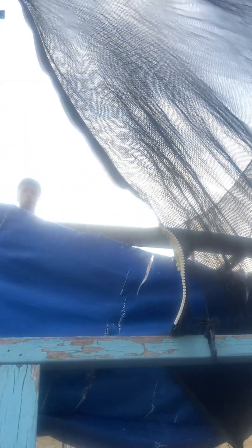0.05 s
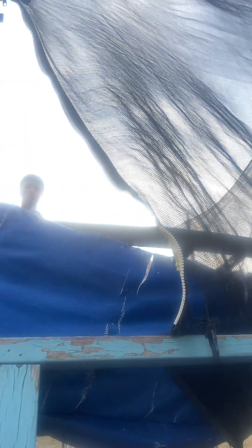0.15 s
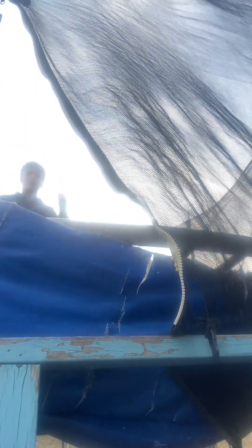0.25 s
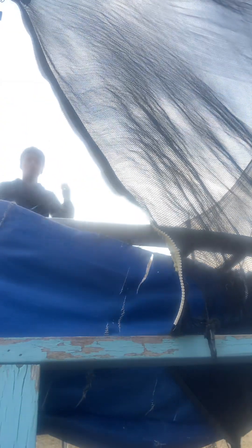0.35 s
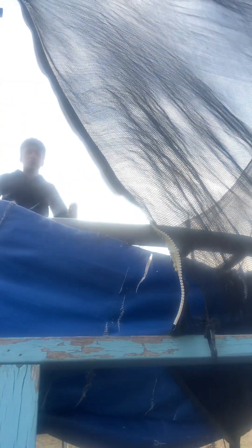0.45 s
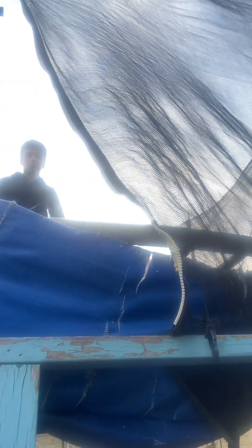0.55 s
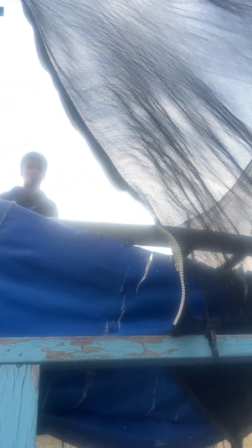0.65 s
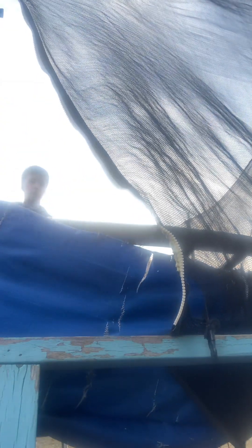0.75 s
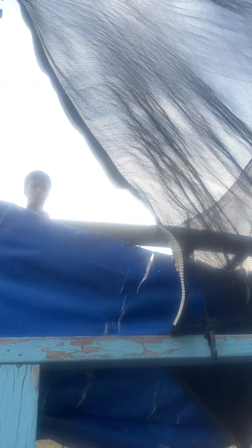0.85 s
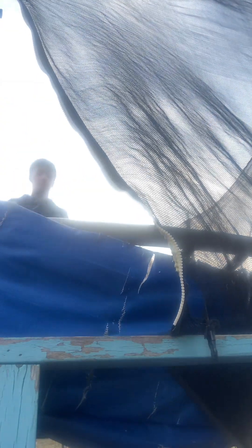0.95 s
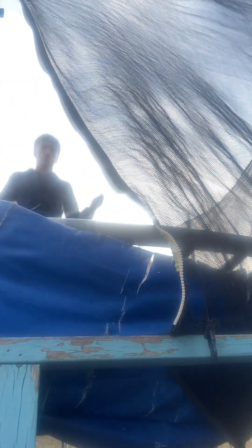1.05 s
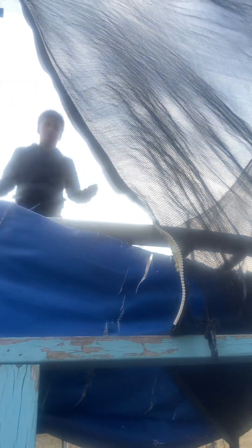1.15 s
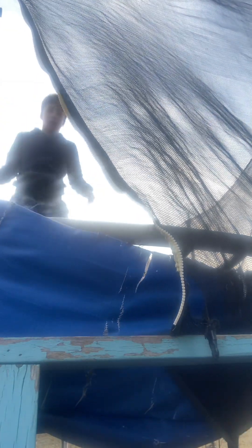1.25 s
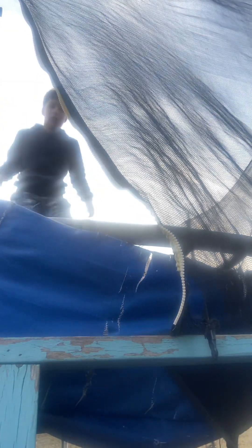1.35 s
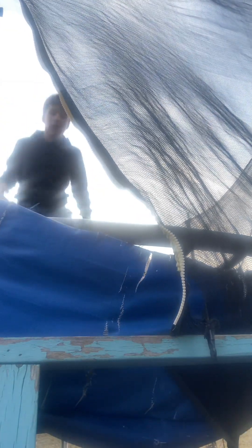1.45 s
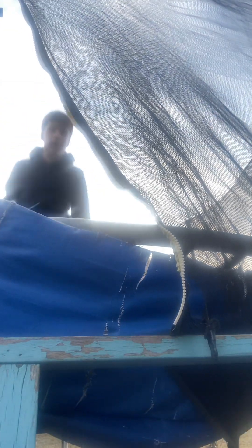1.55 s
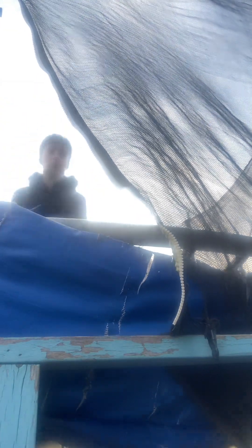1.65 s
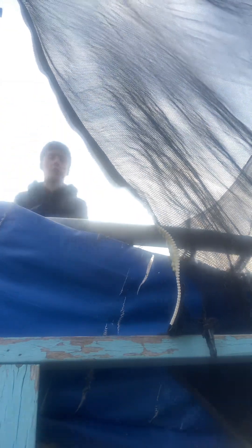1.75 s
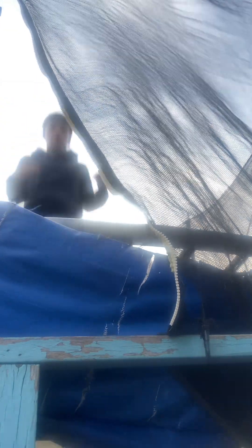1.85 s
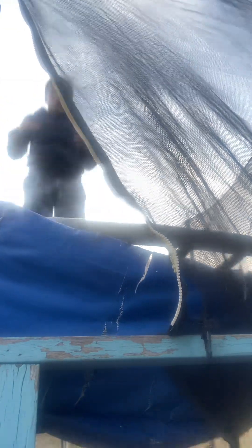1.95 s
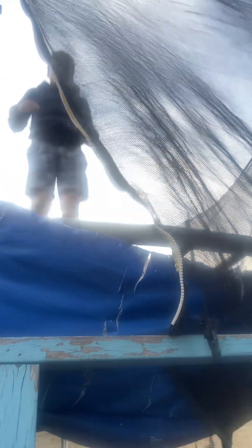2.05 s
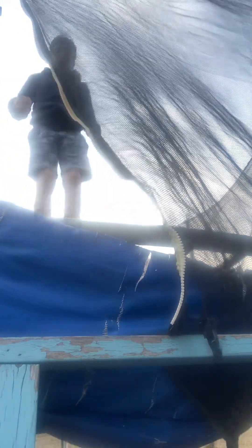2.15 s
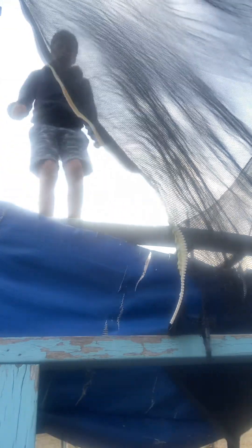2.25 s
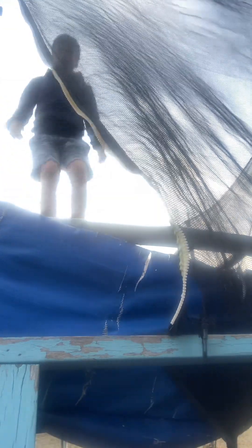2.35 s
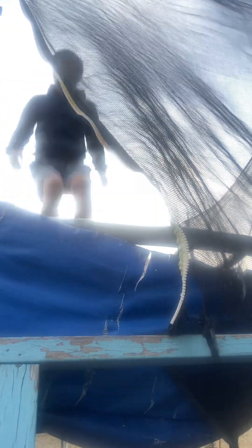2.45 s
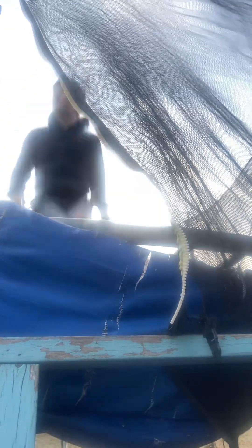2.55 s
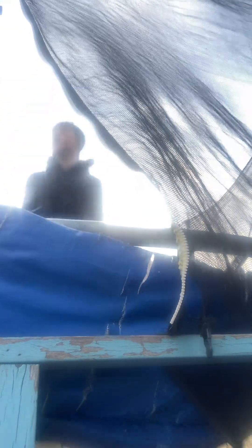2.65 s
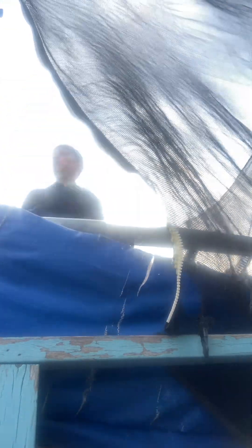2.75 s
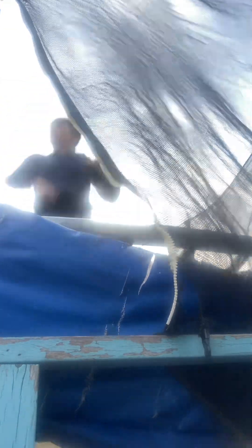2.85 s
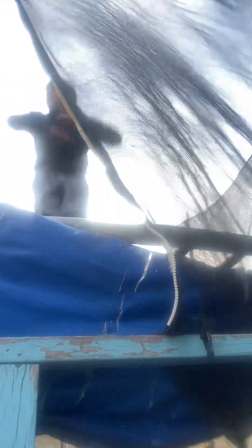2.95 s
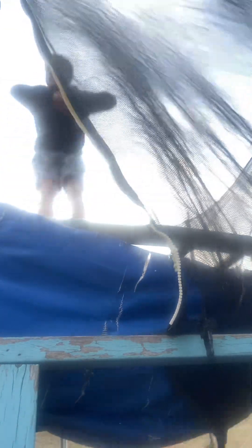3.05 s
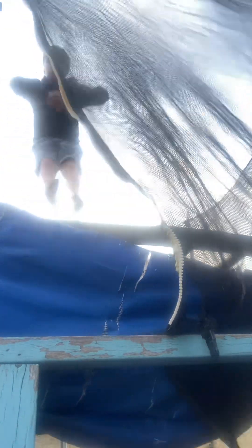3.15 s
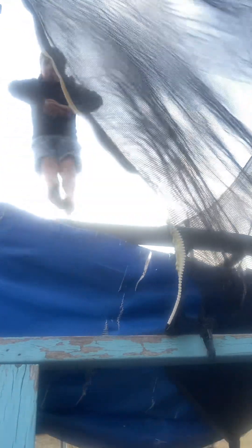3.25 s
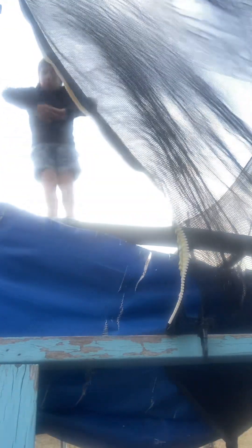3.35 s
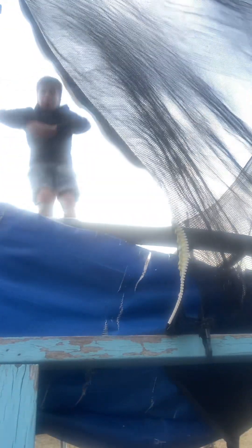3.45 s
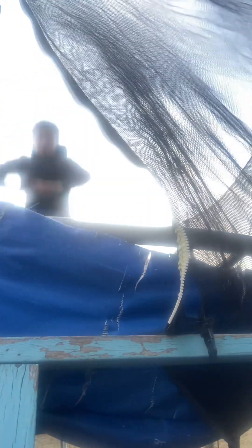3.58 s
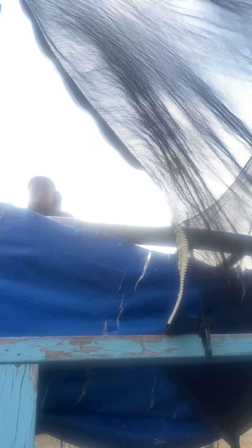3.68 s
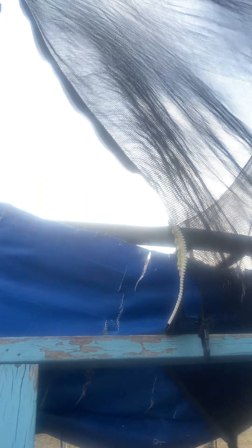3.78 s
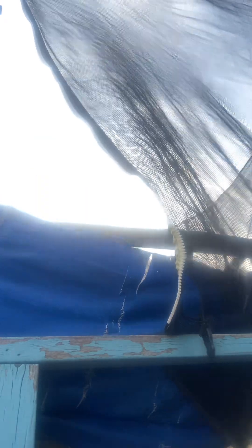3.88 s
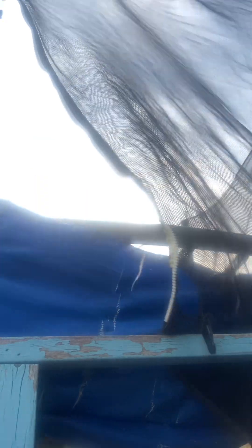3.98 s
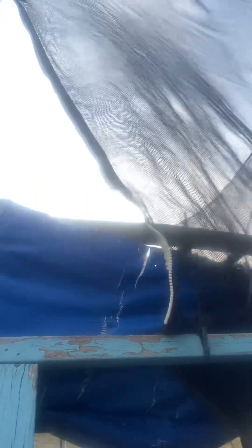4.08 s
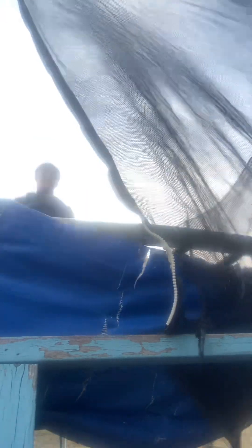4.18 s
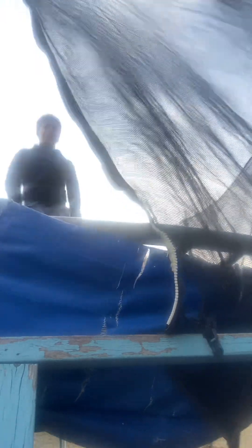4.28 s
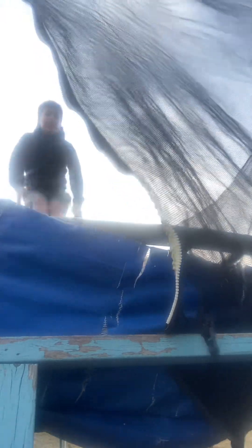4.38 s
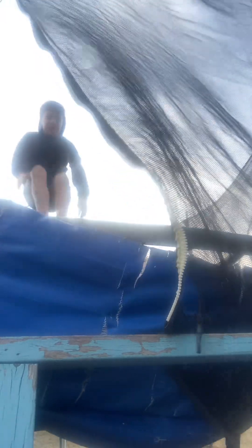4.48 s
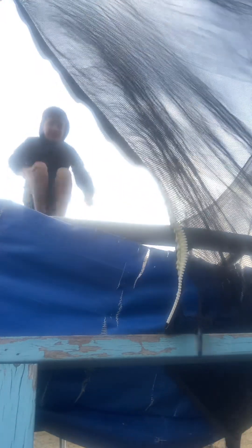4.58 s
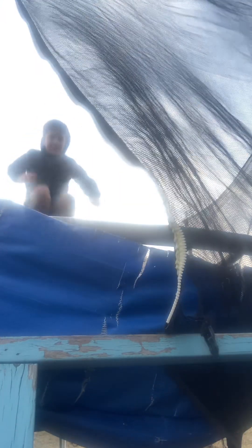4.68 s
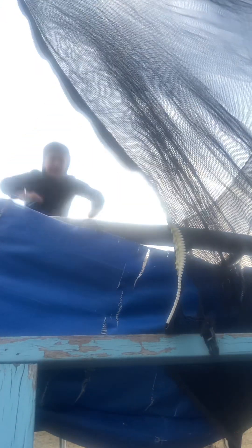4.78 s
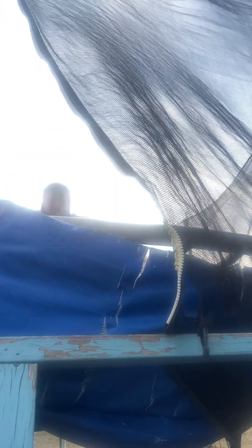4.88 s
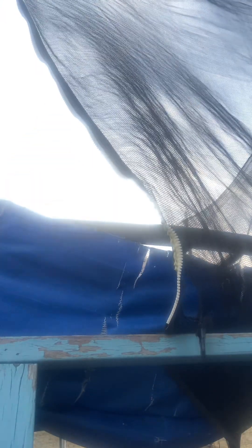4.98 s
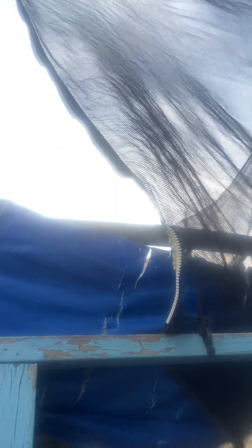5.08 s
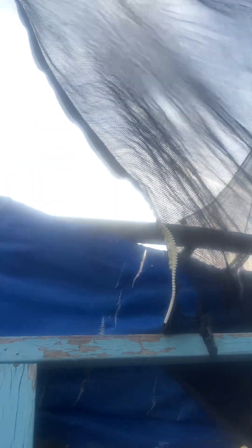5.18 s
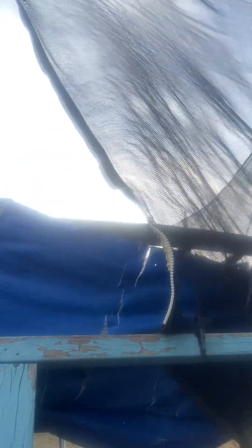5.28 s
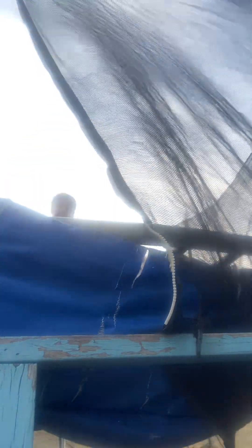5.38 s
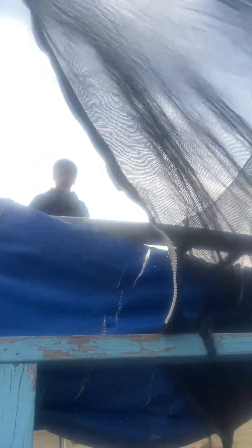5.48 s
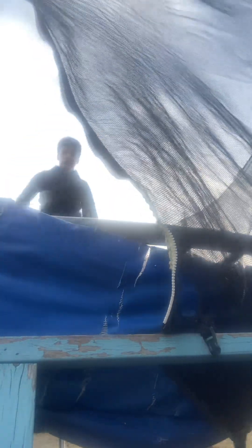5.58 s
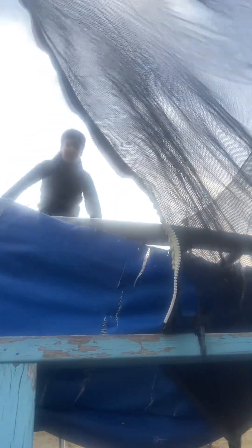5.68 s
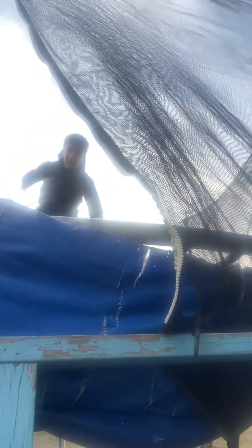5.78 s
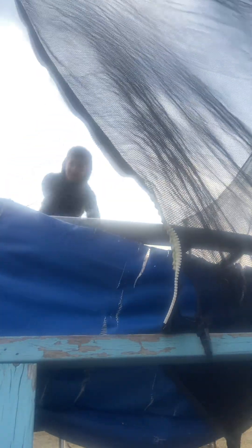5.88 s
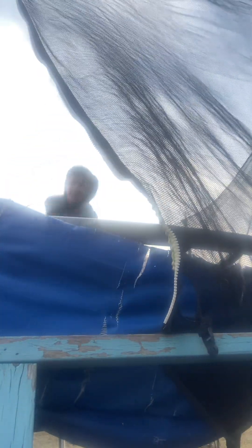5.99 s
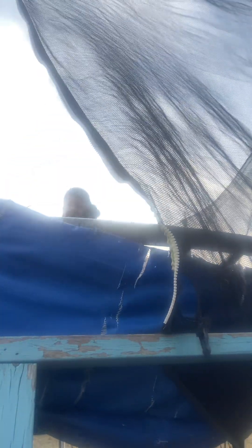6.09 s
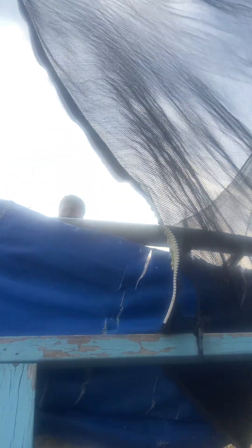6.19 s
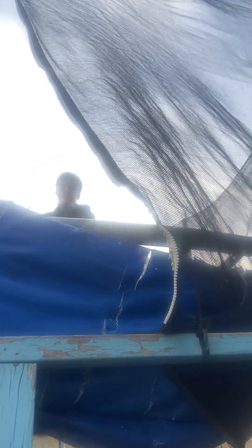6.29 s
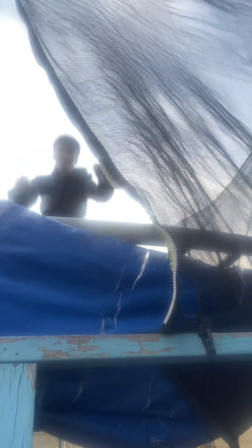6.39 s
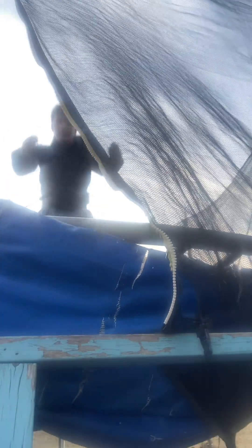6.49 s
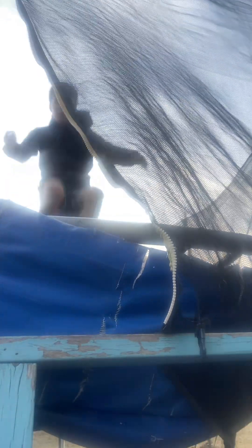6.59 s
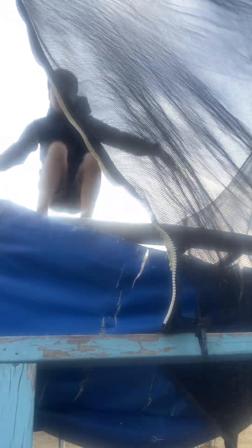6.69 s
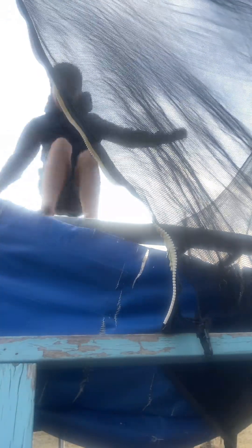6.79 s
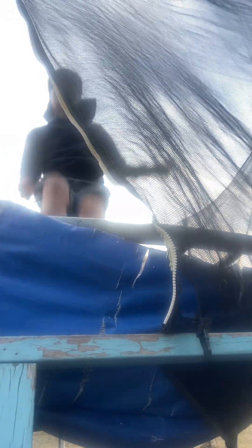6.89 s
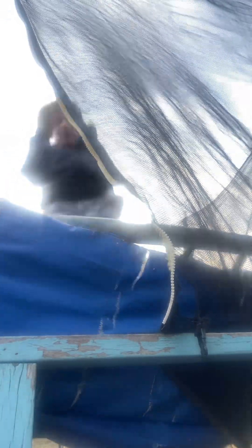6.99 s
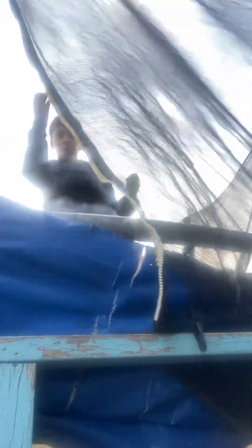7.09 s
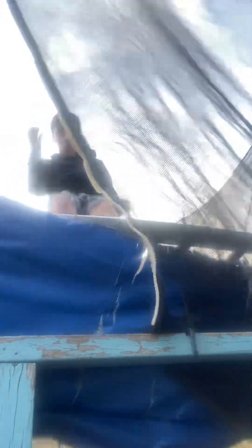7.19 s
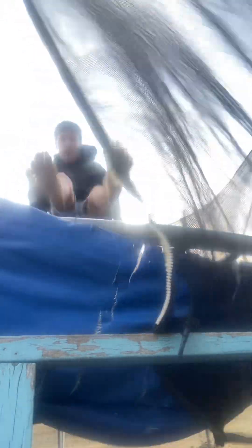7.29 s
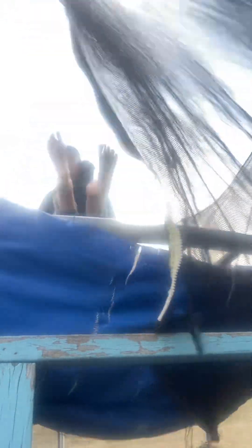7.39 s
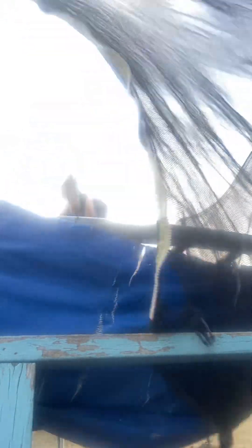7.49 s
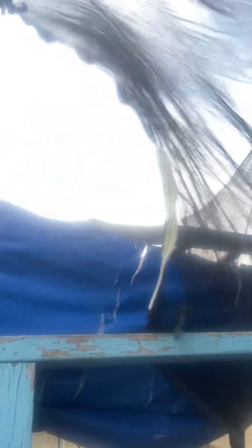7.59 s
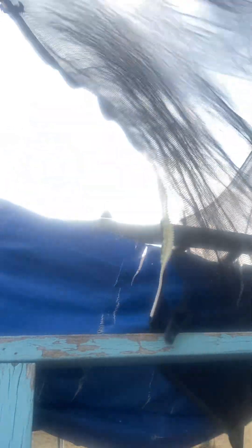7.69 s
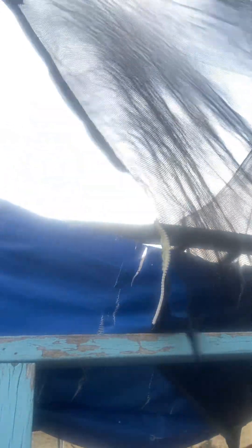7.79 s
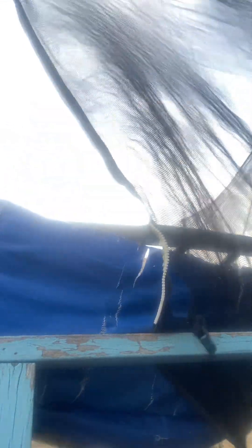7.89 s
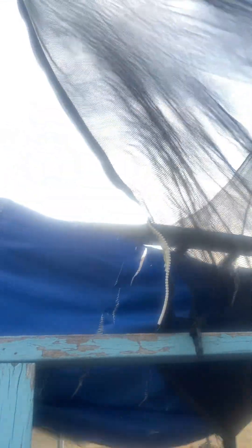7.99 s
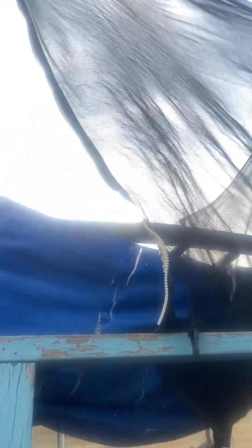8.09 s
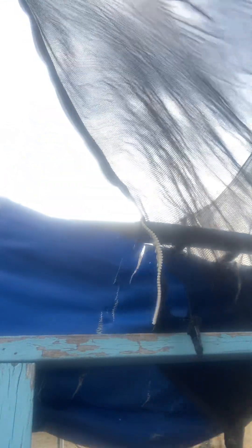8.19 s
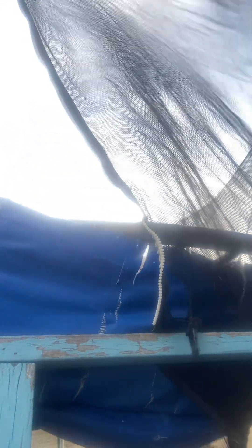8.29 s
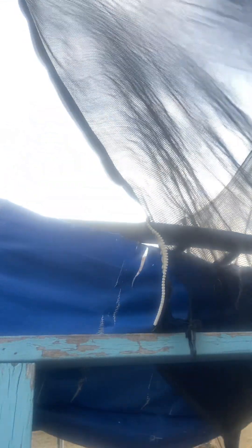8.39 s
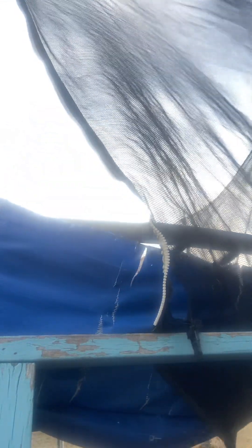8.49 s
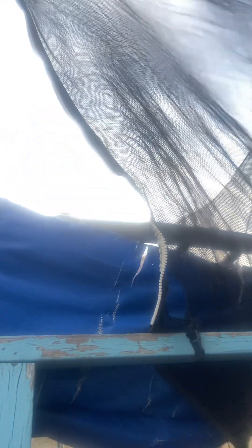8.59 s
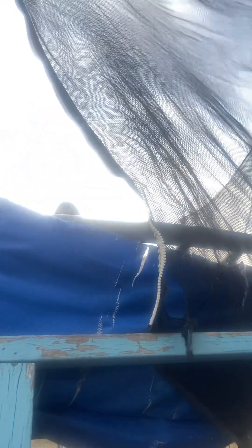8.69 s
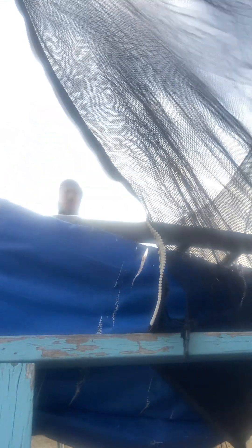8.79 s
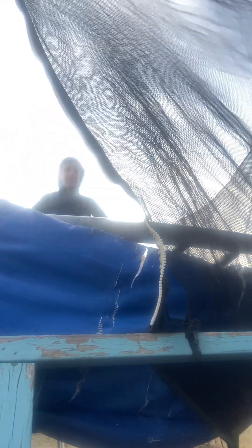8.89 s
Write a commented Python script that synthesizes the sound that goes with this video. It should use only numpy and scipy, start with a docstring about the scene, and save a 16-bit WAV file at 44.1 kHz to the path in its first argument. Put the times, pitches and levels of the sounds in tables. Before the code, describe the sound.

Close beside a trampoline frame, springs creak and plastic scrapes with each bounce, irregular at first, then heavier with deep slack thumps and metallic knocks.

```python
"""A very quiet garden: someone bounces on a trampoline, two microphone ports of a phone close by its frame.
Behind a faint steady hiss, hooks ping, steel squeaks and the frame tube knocks, all as decaying or gliding tones.
Landings thump the mat like a slack drum with a sagging pitch, over a low noise rumble.
The stretching mat drags the plastic cover over the springs: noise, jerky and patchy, coloured by spring ringing,
rasps and creaks, and it slaps in short bursts throughout."""
import sys
import numpy as np
from scipy import signal
from scipy.fft import rfft, irfft, next_fast_len
from scipy.io import wavfile
from scipy.ndimage import uniform_filter1d, map_coordinates

SR = 44100
rng = np.random.default_rng(int(sys.argv[2]) if len(sys.argv) > 2 else 0)


def bounce(signal):
    """Save signal as a 16-bit WAV file at the path given by the first command-line argument."""
    frames = np.transpose(np.atleast_2d(signal))
    limited = np.clip(frames, -1, 1)
    pcm = np.round(limited * 32767).astype(np.int16)
    wavfile.write(sys.argv[1], SR, pcm)


N = 394254  # length in samples
SHARED_ONLY = [[1], [0]]  # puts a sound wholly in the part that left and right share


def amp(db):
    """Gain of a level in dB."""
    return 10 ** (np.asarray(db) / 20)


def unit(x):
    """x at rms 1."""
    return x / np.sqrt(np.mean(x ** 2) + 1e-20)


def along(points, hz):
    """Value at hz, interpolated between (f/Hz, value) points on a log frequency axis."""
    f, value = np.transpose(points)
    return np.interp(np.log(hz + 1), np.log(f + 1), value)


def wobble(rate):
    """Two smooth random curves, rate knots a second."""
    knots = rng.standard_normal((2, int(N * rate / SR) + 4))
    where = np.arange(N) * rate / SR
    return np.array([map_coordinates(k, [where]) for k in knots])


def filtered(x, response):
    """x through a complex response of frequency, by spectrum."""
    m = next_fast_len(N + SR // 2)
    return irfft(rfft(x, m) * response(np.fft.rfftfreq(m, 1 / SR)), m)[..., :N]


def patches(x, depth_db, size, wide, long):
    """x with random gain over its spectrogram, smoothed over wide bins and long frames."""
    spectrum = signal.stft(x, nperseg=size)[2]
    field = rng.standard_normal(spectrum.shape[1:])
    field = uniform_filter1d(field, size=wide, axis=0)
    field = uniform_filter1d(field, size=long, axis=1)
    return signal.istft(spectrum * amp(depth_db * unit(field)), nperseg=size)[1][:, :N]


# the garden around the trampoline: f/Hz, relative level/dB per Hz
GARDEN_COLOUR = [(180, -35), (300, -5), (526, -6), (600, -10), (1240, -5), (1540, -10), (5570, -15),
                 (9000, -15), (13400, -16), (15500, -28)]
GARDEN_DB = -82


def garden():
    """Faint steady hiss: coloured noise, unrelated in the two rows."""
    hiss = filtered(rng.standard_normal((2, N)), lambda f: amp(along(GARDEN_COLOUR, f)))
    return amp(GARDEN_DB) * unit(hiss)


# a spring hook pings: t/s, level/dB
PINGS = [(7.1975, -15)]
# tones of the struck hook: f/Hz, relative level/dB, t60/s
HOOK_MODES = [(2620, -21, 0.05), (4060, 3, 0.024), (7050, -10, 0.07), (7300, -10.5, 0.054),
              (7430, -9.5, 0.041), (9540, -1.5, 0.041)]


def pings():
    """A struck hook rings as decaying sines behind a bright noise tick."""
    out, t = np.zeros(N + SR), np.arange(SR // 4) / SR
    for s, db in PINGS:
        ring = sum(amp(level - 60 * t / t60) * np.sin(2 * np.pi * hz * t) for hz, level, t60 in HOOK_MODES)
        noise = np.convolve(rng.standard_normal(len(t)), [.5, 1, .5, -.5, -1, -.5], 'same')
        tick = .8 * amp(-60 * t / .008) * noise
        out[round(s * SR):][:len(t)] += amp(db - 9) * (ring + tick)
    return out[:N] * SHARED_ONLY


# short squeaks of the steel: t/s, level/dB, start f/Hz, end f/Hz, length/s
SQUEAKS = [(0.109, -48, 3010, 2970, 0.2), (0.336, -50, 2950, 2857, 0.11), (3.322, -67, 2650, 2650, 0.091),
           (3.549, -70, 10770, 10200, 0.039), (5.271, -25, 2834, 2850, 0.05),
           (6.692, -56, 2210, 2150, 0.11), (7.481, -49.5, 9500, 10300, 0.034),
           (7.567, -51, 10700, 10200, 0.021), (7.625, -67.5, 10900, 10870, .02)]
SLIP_BLUR = .03  # phase wander at 3 kHz, radians a sample


def squeaks():
    """Brief gliding tones; unsteady slipping blurs their phase, high ones most."""
    out, t = np.zeros(N + SR), np.arange(SR // 4) / SR
    for s, db, from_hz, to_hz, length in SQUEAKS:
        u = np.clip(t / length, 0, 1)  # progress through the squeak
        blur = SLIP_BLUR * (from_hz / 3000) ** 1.3
        drift = np.cumsum(rng.normal(0, blur, len(t)))
        glide = 2 * np.pi * np.cumsum(from_hz + (to_hz - from_hz) * u) / SR
        swell = np.sin(np.pi * u ** 0.5)
        out[round(s * SR):][:len(t)] += amp(db) * swell * np.sin(glide + drift)
    return out[:N] * SHARED_ONLY


# hollow knocks on the frame beside the microphone: t/s, level/dB, strongest region f/Hz
KNOCKS = [(1.835, -29.5, 510), (2.839, -19.5, 468), (3.971, -18, 692), (4.005, -23, 503), (4.034, -27, 450),
          (4.43, -38, 398), (4.594, -34.5, 1013), (4.711, -44, 445), (4.906, -52, 960), (5.033, -28, 900),
          (5.257, -18, 580), (5.294, -32, 700), (6.921, -31.5, 497), (7.674, -24, 1030), (7.686, -26, 600),
          (8.193, -22.5, 990)]
# tones of the frame tube: f/Hz, relative level/dB, t60/s
FRAME_MODES = [(271, -5.5, .04), (454, 0, 0.1), (532, 6, 0.042), (667, 3.5, 0.054), (875, -6.5, 0.041),
               (1052, 6.5, 0.047), (1344, 3, 0.039), (1790, -1, .05)]


def frame():
    """Each knock rings the tube's modes, favouring those near the region that the blow excites."""
    out, t = np.zeros(N + SR), np.arange(SR // 8) / SR
    for s, db, peak_hz in KNOCKS:
        ring = 0
        for hz, level, t60 in FRAME_MODES:
            reach_db = -9 * np.log2(hz / peak_hz) ** 2
            level_db = level + reach_db + rng.normal(0, 2)
            ring = ring + amp(level_db - 60 * t / t60) * np.sin(2 * np.pi * hz * t)
        onset = 1 - np.exp(-t / 0.0002)
        out[round(s * SR):][:len(t)] += amp(db + 0.5) * ring / np.abs(ring).max() * onset
    return out[:N] * SHARED_ONLY


def jerks(catch, rate, decay_s):
    """Gain that jumps at random, rate a second, where the cover catches and lets go, then decays to 1."""
    snags = (rng.random(N) < rate / SR) * rng.uniform(0, catch, N)
    return 1 + signal.lfilter([1], [1, -np.exp(-1 / (decay_s * SR))], snags)


def scratch(grit_db, catch, patchy_db, creak_db):
    """Two unrelated scratches from white noise: uneven micro-slips in patches of random colour."""
    slips = rng.standard_normal((2, N)) * amp(grit_db * wobble(350)[0])
    broad = patches(slips, patchy_db, size=512, wide=6, long=8)
    creaky = patches(broad, creak_db, size=1024, wide=1, long=7)  # thin streaks: single springs sing for a moment
    return unit(jerks(catch, rate=90, decay_s=.007) * creaky)


# colour of the plastic cover on the springs: f/Hz, relative level/dB per Hz
RASP_COLOUR = [(150, -36), (250, -18.5), (347, -19.5), (385, -10.5), (978, -6.5), (1510, -5.5), (2060, -4),
               (2440, 1), (2760, 1.5), (3700, -9.5), (4320, -13), (5410, -13), (6210, -12), (7130, -10),
               (12500, -26), (15500, -38)]
# ringing of the springs: f/Hz, width/Hz, level over the rasp/dB
SPRING_MODES = [(700, 59, -1.5), (985, 45, 3.5), (1380, 85, -5), (1793, 26, 5.5), (2100, 17, 12.5),
                (2240, 70, 3), (2852, 71, 3), (3010, 110, 4), (4278, 250, 8.5), (6315, 46, 7.5),
                (6610, 71, 5), (7540, 40, 0)]


def plastic(x):
    """Colour by cover and spring resonances; returns low, middle and high parts, each at rms 1."""
    def ring(f):
        gain = 1
        for centre, width, db in SPRING_MODES:
            band = 1j * f * width
            gain = gain + (amp(db) - 1) * band / (centre ** 2 - f ** 2 + band)
        return gain
    coloured = filtered(x, lambda f: amp(along(RASP_COLOUR, f)) * ring(f))
    low = filtered(coloured, lambda f: 1 / (1 + (f / 1400) ** 6))
    high = filtered(coloured, lambda f: 1 - 1 / (1 + (f / 5200) ** 12))
    return unit(low), unit(coloured - low - high), unit(high)


# the cover slapping springs and frame: t/s, level/dB, low part (weight)/dB, high part (brightness)/dB
SLAPS = [(0.1108, -35, -7, -13), (0.671, -35.5, -16, -4.5), (1.286, -32, -16, -10), (1.348, -35, -6, -9.5),
         (1.528, -55.5, -4, -15), (1.577, -33.5, -5, -15), (1.6, -27, -5, -20.5), (2.166, -41.5, -8, -3.5),
         (2.2458, -48, -23, -10.5), (2.2677, -48, -25, -5.5), (2.5493, -63, 21, -17),
         (2.5811, -27.5, -11, -17), (2.63, -29, -23, -13), (2.847, -18.5, -22, -11),
         (3.0493, -30.5, -22, -22), (3.113, -31.5, -35, -6.5), (3.1542, -40.5, -9, -9),
         (3.1934, -35, -17, -10.5), (3.2434, -47.5, 7, -4.5), (3.328, -62, -17, -22), (3.45, -53, -22, -23),
         (3.778, -29, 4, -10), (4.388, -33.5, -6.5, -4.5), (4.5107, -39.5, -18, -4),
         (4.599, -32.5, -8.5, -19), (4.704, -57.5, 13, -28), (4.905, -47, -3, -15.5),
         (5.024, -45.5, 12, -1.5), (5.239, -17.5, 1, -6.5), (5.391, -18, -25.5, -11.5),
         (5.4399, -24, -33, -11), (5.4787, -24.5, 1.5, -10.5), (5.574, -28.5, -16, -9.5),
         (5.6414, -33, -22, -10.5), (5.7315, -38.5, -6, -10), (5.8491, -47, 6, -26),
         (5.9767, -41.5, -8, -10), (6.0252, -41.5, -1, -17), (6.069, -34, -2, -16.5),
         (6.089, -27, -5, -6.5), (6.5224, -33, -19, -15.5), (6.685, -27.5, -27, -12), (6.916, -47, 9, -28),
         (6.935, -28, -10, -10.5), (6.945, -28.5, -5, 6.5), (6.964, -30.5, -14, 7), (7.198, -15.5, -25, -3),
         (7.2486, -24.5, -21, -12.5), (7.5184, -43.5, -6, -1.5), (7.677, -34, 9.5, -26),
         (7.7973, -31.5, -17, -6.5), (8.2607, -27, -13, -1.5), (8.325, -31.5, 0, -8),
         (8.4338, -21, -17, -6.5), (8.527, -30, -4, -14.5), (8.7774, -30.5, -15, -9),
         (8.8082, -32, -13, -8)]
CRACK, CRACK_T60_S = 1, .03  # extra treble at the start of a slap, over its rattle


def slaps():
    """Each slap is a sudden burst of plastic rattle whose treble starts with a short extra crack."""
    low, mid, high = plastic(scratch(grit_db=1, catch=0.38, patchy_db=2, creak_db=7.5))
    out, t = np.zeros((2, N)), np.arange(SR // 4) / SR
    for s, db, weight_db, bright_db in SLAPS:
        i = round(s * SR)
        n = min(len(t), N - i)
        u, span = t[:n], slice(i, i + n)
        fall_db = -60 * u / 0.12
        burst = (mid[:, span] + amp(weight_db) * low[:, span]) * amp(fall_db)
        treble_fall = amp(0.86 * fall_db) + CRACK * amp(-60 * u / CRACK_T60_S)
        burst += amp(bright_db - 2.0) * high[:, span] * treble_fall
        onset = 1 - np.exp(-u / 0.0015)
        out[:, span] += amp(db - 11) * onset * burst
    return out


# each stroke of the mat, sinking or springing back: t of fastest motion/s, rasp level/dB, rise/s, fall/s,
# high part over rasp (brightness)/dB, low part over rasp (weight)/dB, rumble level/dB
STROKES = [(0.0, -38, .05, 0.11, -5.5, -6.5, -60), (0.256, -45.5, 0.21, 0.068, -10.5, -8, -67),
           (0.47, -43, 0.19, 0.11, -7.5, -8, -66.5), (.6, -68, 0.082, 0.19, -8.5, 0, -68),
           (.715, -45, 0.065, 0.24, -5, -5.5, -67), (0.866, -32, .13, 0.064, -4.5, -9.5, -59),
           (.98, -48, 0.21, 0.16, 1.5, -12, -75), (1.17, -42, 0.4, 0.2, -7.5, -8.5, -75),
           (1.29, -49.5, 0.075, 0.042, -12.5, -6, -80), (1.358, -54.5, 0.053, .065, -1.5, -16, -85),
           (1.45, -78, 0.082, 0.42, -10.5, -1, -76), (1.693, -28.5, 0.11, 0.15, -4.5, -8, -56),
           (1.902, -34.5, 0.13, 0.27, -6.5, -7.5, -61), (2.05, -42, 0.081, 0.091, -2.5, -5, -56),
           (2.19, -66, 0.16, 0.27, -6, 0, -70), (2.704, -27.5, 0.1, 0.13, -3, -7, -49),
           (2.87, -34.5, 0.071, 0.32, -6, -6, -52.5), (3.061, -46.5, 0.18, 0.077, -7, -4.5, -61),
           (3.207, -57, 0.021, 0.031, -1, 5.5, -69), (3.3, -67, 0.26, 0.28, -13, -7.5, -69.5),
           (3.799, -32.5, 0.028, 0.27, -3.5, -7.5, -51), (3.917, -24, 0.11, 0.1, -5, -9, -40),
           (4.016, -27.5, 0.062, 0.063, -4.5, -6.5, -32), (4.17, -36.5, 0.29, 0.12, -5, -4, -47),
           (4.28, -39.5, 0.23, 0.1, -8, -7, -56), (4.41, -57, 0.067, 0.1, -6.5, 1, -51.5),
           (4.61, -58, 0.25, 0.079, -12, -2.5, -67), (4.7, -68.5, 0.064, 0.11, -11, 1, -62.5),
           (4.85, -76, 0.081, 0.086, -11, 11.5, -66), (5.081, -34.5, 0.034, 0.17, -1, -8, -48),
           (5.185, -27, 0.13, 0.081, -5, -9.5, -49), (5.285, -33, 0.17, 0.061, -4.5, -5.5, -34.5),
           (5.393, -36.5, 0.15, 0.12, -5, -8, -54), (5.488, -38.5, .06, .12, -10.5, -8, -55),
           (5.63, -50, 0.14, 0.076, -7, -2.5, -51.5), (5.8, -62.5, 0.59, 0.22, -11.5, -1.5, -65),
           (6.01, -68, 0.062, 0.12, -11, -1, -63.5), (6.165, -29.5, 0.094, 0.19, -4.5, -7, -56.5),
           (6.371, -38, 0.12, 0.087, -3.5, -7.5, -62), (6.529, -43.5, 0.4, 0.097, -7.5, -6, -68),
           (6.66, -64, 0.17, 0.094, -11, -2, -68), (6.703, -49.5, 0.048, 0.086, -10, -11, -67),
           (6.84, -76, 0.12, 0.45, -16, 2.5, -71.5), (7.032, -27, 0.084, 0.16, -2.5, -6.5, -38.5),
           (7.165, -30.5, 0.044, 0.079, -5.5, -11, -44), (7.27, -32.5, 0.16, .14, -6.5, -7, -43.5),
           (7.44, -41, 0.16, 0.06, -6.5, -7.5, -48), (7.57, -55, 0.35, 0.2, -10.5, 2, -57),
           (7.685, -45, 0.029, 0.23, -11.5, -6.5, -52.5), (7.813, -29.5, 0.029, 0.4, -10.5, -8.5, -64),
           (7.93, -27.5, 0.14, 0.15, -6, -8, -43.5), (8.118, -31, 0.063, 0.05, -5, -7.5, -48),
           (8.18, -32.5, .1, 0.065, -5.5, -9, -48), (8.301, -40.5, .12, .12, -11, -4, -54.5),
           (8.441, -46, 0.054, 0.12, -10, -3, -48.5), (8.56, -34.5, 0.068, 0.21, -9, -8, -55),
           (8.686, -35.5, 0.12, 0.13, -6, -7, -52), (8.94, -38.5, 0.19, 0.13, -8.5, -5.5, -71)]
EDGE_DB = 23.5  # a stroke is this far down after its rise time or its scaled fall time
RISE_SHAPE, FALL_SHAPE = 2, 1.79  # higher shapes have steeper flanks
SETTLE_DB, SETTLE_T60_S = -36, 0.57  # faint tail after a stroke, relative to its level


def strokes(levels_db, longer):
    """Gain of all strokes, summed in power: rounded swells with faint tails; longer scales the fall times."""
    t, power = np.arange(0, N + 64, 64) / SR, 0  # one point every 64 samples
    for (s, _, rise, fall, *_), db in zip(STROKES, levels_db):
        away = np.abs(t - s)
        rising = (away / rise) ** RISE_SHAPE
        falling = (away / fall / longer) ** FALL_SHAPE
        swell = np.where(t < s, rising, falling)
        settle = (t > s) * amp(2 * (SETTLE_DB - 60 * away / SETTLE_T60_S))
        power = power + amp(2 * db) * (amp(-2 * EDGE_DB * swell) + settle)
    return np.interp(np.arange(N) / SR, t, np.sqrt(power))


# feet landing and the mat snapping taut: t/s, level/dB, first f/Hz, last f/Hz, swell/s
THUMPS = [(.034, -46.5, 101, 72.4, 0.026), (.615, -65, 90, 60, 0.017), (0.788, -53, 110, 70, 0.0089),
          (.885, -59, 90, 60, .02), (1.498, -50.5, 69.8, 49.5, 0.015), (1.725, -42, 110.3, 60.4, 0.017),
          (1.838, -37, 102.8, 80, 0.0079), (2.556, -36, 108.7, 45, 0.017), (2.62, -39.5, 55.1, 42, 0.032),
          (2.78, -23.5, 111.4, 82, 0.013), (2.842, -27, 155, 105, 0.0049), (3.748, -41.5, 89.4, 60, 0.011),
          (3.769, -24, 86.7, 64.7, 0.021), (3.823, -31, 75, 62, 0.014), (3.856, -32.5, 60, 49.7, 0.023),
          (3.908, -27.5, 107.7, 100.7, 0.0094), (3.97, -28, 122, 100.5, 0.023),
          (4.108, -41, 80, 65, 0.0084), (4.4, -59, 90, 60, 0.019), (5.003, -33, 169, 90, 0.008),
          (5.036, -19.5, 190.5, 86, 0.0068), (5.053, -21.5, 111, 55, 0.019), (5.11, -33.5, 55, 42.2, .04),
          (5.255, -25, 146, 112, 0.0082), (6.918, -24.5, 142, 70, 0.015), (7.109, -24, 108, 76, 0.011),
          (7.771, -33.5, 85, 60, 0.011), (7.895, -29, 88.5, 65, 0.012), (8.0, -23.5, 93, 78, 0.006),
          (8.105, -33, 86, 70, 0.0082), (8.19, -35, 84, 72, 0.011), (8.475, -36.5, 79.4, 57.7, 0.0078)]
REST_DB = -87  # rumble of the mat at rest
AFTER_DB, AFTER_T60_S = -6.5, 0.18  # rumble that a thump starts, relative to its level
RUMBLE_WIDER = 1.4  # scales the fall of a stroke's rumble


def heave():
    """Gain of the rumble: every stroke stirs it, every thump kicks it."""
    t = np.arange(N) / SR
    power = strokes(np.transpose(STROKES)[-1], RUMBLE_WIDER) ** 2 + amp(2 * REST_DB)
    for s, db, _, _, swell in THUMPS:
        u = np.maximum(t - s, 0)
        dying = amp(2 * (AFTER_DB - 60 * u / AFTER_T60_S))
        power += amp(2 * db) * np.minimum(u / swell, 1) ** 2 * dying
    return np.sqrt(power)


# colour of the mat's rumble: f/Hz, relative level/dB per Hz
RUMBLE_COLOUR = [(12, -39.5), (26, -3), (42, 3.5), (60, 2.5), (120, -1.5), (260, -11.5), (400, -11.5),
                 (520, -32.5), (880, -120)]


def mat():
    """Landings ring the mat like a slack drum whose pitch sags; low lumpy noise rumbles with its motion."""
    out, t = np.zeros(N + SR), np.arange(SR // 2) / SR
    for s, db, first_hz, last_hz, swell in THUMPS:
        pitch = last_hz + (first_hz - last_hz) * np.exp(-t / 0.016)
        turn = 2 * np.pi * np.cumsum(pitch) / SR
        push = (t / swell * np.exp(1 - t / swell)) ** 2  # the mat loads, then lets go quickly
        second_mode = 0.22 * np.sin(2.28 * turn + rng.uniform(0, 2 * np.pi))
        out[round(s * SR):][:len(t)] += amp(db) * push * (np.sin(turn) + second_mode)
    lumps = amp(2.6 * wobble(25)[0]) * rng.standard_normal((2, N))
    rumble = unit(filtered(lumps, lambda f: amp(along(RUMBLE_COLOUR, f))))
    return out[:N] * SHARED_ONLY + heave() * rumble


CRACKLE, CRACKLE_RATE, CRACKLE_S = .9, 120, .003  # dry treble ticks of the cover: largest jump, per second, decay/s


def drag():
    """The stretching mat rubs the cover over the springs: stroke swells drive three bands of rasp."""
    _, rasp_db, _, _, bright_db, weight_db, _ = np.transpose(STROKES)
    low, mid, high = plastic(scratch(grit_db=1.4, catch=.5, patchy_db=0.9, creak_db=4.4))
    ticking = unit(jerks(CRACKLE, CRACKLE_RATE, CRACKLE_S) * high)
    body = strokes(rasp_db, 0.86) * mid
    weight = strokes(rasp_db + weight_db, 1) * low
    treble = strokes(rasp_db + bright_db, 0.82) * ticking
    return body + weight + treble


# likeness of left and right, which are nearly the same in the high treble: f/Hz, correlation (0 to 1)
ALIKE = [(30, 0.4), (120, 0.69), (300, 0.53), (700, 0.51), (1400, 0.4), (3000, 0.65), (5200, 0.31),
         (6400, 1)]
MOST_ALIKE = .999


def scene():
    """Mix the sources: row 0 is what left and right share, row 1 how they differ; returns left and right."""
    shared, other = garden() + pings() + squeaks() + frame() + slaps() + mat() + drag()

    def turn(f):
        return np.arccos(np.clip(along(ALIKE, f), 0, MOST_ALIKE)) / 2
    mid = filtered(shared, lambda f: np.cos(turn(f)))
    side = filtered(other, lambda f: np.sin(turn(f)))
    return np.array([mid + side, mid - side])


# phase between the ports: f/Hz, left lead/rad
LEAD = [(30, 0), (520, 0), (780, 1.5), (1380, 1.9), (1810, 5.5), (2840, 5.7), (3190, 4.6), (4310, 5.7),
        (4740, 3.9), (5510, 2.9), (5770, 1.3), (6370, 0), (15200, 0)]
# level between the ports: f/Hz, left minus right/dB
LEAN = [(30, .5), (60, -1), (150, -2.5), (300, 0), (700, 1.8), (1400, 2.2), (3000, 2.3), (5000, 0),
        (15000, 0)]
TOP_HZ, BASS_CUT_HZ = 15720, 30


def record(dry):
    """The ports differ in phase and level; deepest bass is cut and nothing passes above the band limit."""
    def ports(f):
        half = amp(along(LEAN, f) / 2) * np.exp(.5j * along(LEAD, f))
        port_gain = 1 / np.maximum(np.abs(half + 1 / half) / 2, .75)  # evens the sum of the ports, within limits
        ratio = BASS_CUT_HZ / (f + 1)
        bass_cut = 1 / (1 - 1.4j * ratio - ratio ** 2)
        return np.array([half, 1 / half]) * port_gain * (f < TOP_HZ) * bass_cut
    return filtered(dry, ports)


dry = scene()
out = record(dry)
bounce(out)
```